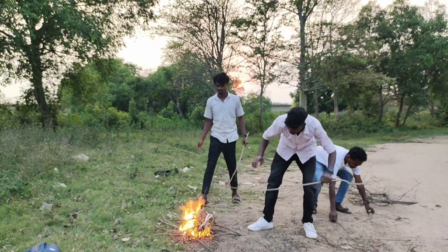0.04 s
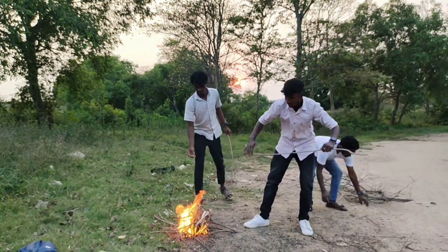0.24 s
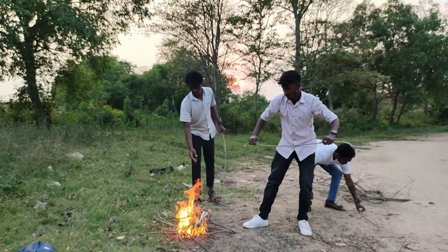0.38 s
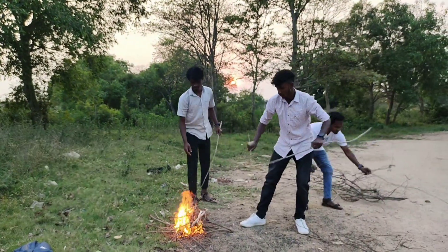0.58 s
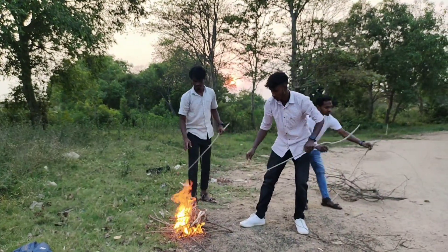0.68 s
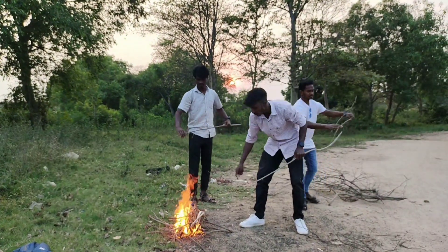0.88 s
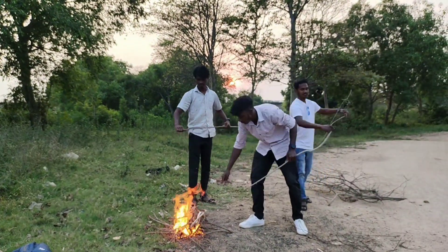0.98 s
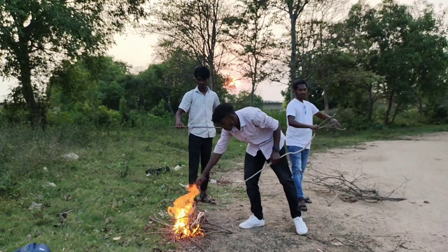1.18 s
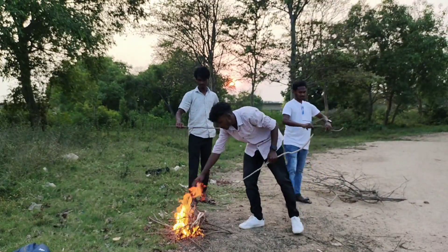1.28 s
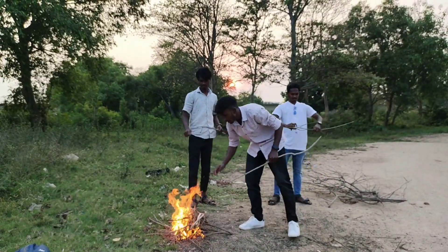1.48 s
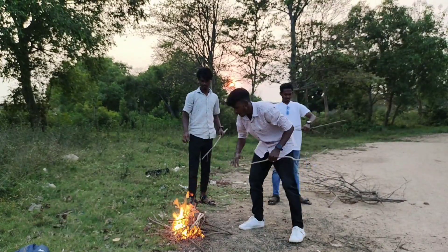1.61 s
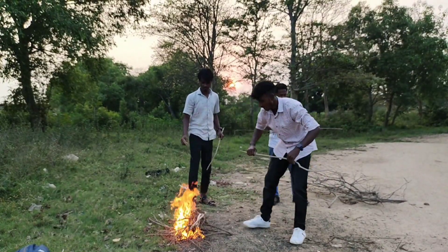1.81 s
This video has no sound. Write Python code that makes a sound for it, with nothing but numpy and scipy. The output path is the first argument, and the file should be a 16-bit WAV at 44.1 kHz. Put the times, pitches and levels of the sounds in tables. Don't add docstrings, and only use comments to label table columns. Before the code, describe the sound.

A small twig fire crackles close by: quick wooden taps and cracks, then one loud sharp pop, then sparse light snaps. Behind it, a steady cicada buzz, chirping birds and a faint distant engine, in stereo outdoors.

```python
import sys
import numpy as np
from scipy import signal
from scipy.fft import rfft, irfft
from scipy.io import wavfile
from scipy.ndimage import uniform_filter1d

SR = 44100
rng = np.random.default_rng(int(sys.argv[2]) if len(sys.argv) > 2 else 0)


def gain_from_db(level_db):
    decades = np.asarray(level_db, float) / 20
    return 10 ** decades


def inscribe(sig):
    pcm = np.round(np.clip(np.atleast_2d(sig).T, -1, 1) * 32767)
    wavfile.write(sys.argv[1], SR, pcm.astype(np.int16))


N = 81585

# freq_hz, density_db (per Hz)
WASH_SPECTRUM = [(30, -22), (60, -14), (110, 1), (300, -7), (600, -18), (2200, -25), (4200, -21),
                 (6500, -33), (15000, -35)]
# freq_hz, coherence (0-1)
WASH_COHERENCE = [(60, 1), (250, 0.78), (640, 0.46), (1500, 0.0087), (15000, 0.078)]
# freq_hz, difference_db
WASH_BALANCE = [(100, 0.82), (1000, 2), (4400, 4.3), (7000, 5)]
# freq_hz, depth_db
WASH_PATCHES = [(100, 1), (500, 3.4), (2000, 3.5)]
# freq_hz, level_db
ENGINE_HUM = [
    (118, -66),
    (173, -63),
]
# start_s, length_s, from_hz, to_hz, level_db
BIRD_NOTES = [(0, 0.0051, 5450, 4720, -45.5), (0.013, 0.026, 5750, 5900, -47),
              (0.118, 0.05, 5560, 5070, -56.5), (0.188, 0.013, 4910, 4920, -51),
              (0.25, 0.029, 5850, 6450, -50.5), (0.319, 0.018, 5800, 5100, -47),
              (0.343, 0.026, 5260, 4550, -52), (0.354, 0.02, 5630, 6100, -51.5),
              (0.392, 0.044, 5500, 5790, -55.5), (0.408, 0.031, 3800, 5520, -53),
              (0.439, 0.022, 5410, 4950, -49.5), (0.486, 0.017, 4650, 3550, -51.5),
              (0.527, 0.024, 5200, 4600, -52.5), (0.633, 0.025, 6220, 5570, -53),
              (0.658, 0.051, 5460, 5000, -51.5), (0.736, 0.027, 5140, 4300, -51.5),
              (0.742, 0.038, 4110, 3470, -53), (0.84, 0.034, 4740, 4650, -51),
              (.588, 0.013, 6140, 5450, -55), (0.589, 0.023, 5100, 4670, -59),
              (0.6, .022, 6000, 6500, -59), (.645, 0.035, 4700, 4480, -60),
              (0.695, 0.02, 4380, 3970, -57.5), (0.774, 0.013, 4620, 4560, -51.5),
              (0.748, 0.032, 5630, 5400, -56.5), (.79, 0.017, 3636, 3960, -54),
              (0.807, 0.013, 4430, 5000, -50.5), (0.825, 0.017, 5270, 5440, -59),
              (0.889, 0.023, 5000, 5200, -56),
              (1.199, .02, 6550, 5870, -50), (1.22, 0.011, 6400, 5640, -74),
                   (1.275, 0.016, 6100, 5800, -54), (1.246, 0.052, 2650, 2470, -65.5),
                   (1.298, 0.045, 4700, 6300, -59), (1.378, 0.021, 5200, 4860, -79),
                   (1.453, 0.013, 3640, 3770, -58), (1.53, 0.012, 5420, 4530, -54.5),
                   (1.553, 0.031, 5150, 4720, -49.5), (1.554, 0.013, 6450, 5880, -54),
                   (1.622, 0.031, 5310, 4580, -49.5), (1.672, 0.034, 5200, 4530, -53),
                   (1.72, 0.03, 5000, 4650, -57.5), (1.758, 0.023, 5230, 4960, -53.5),
                   (1.785, 0.022, 5200, 4540, -50.5), (1.824, 0.01, 4740, 4330, -53)]
# start_s, peak_db
ENGINE_BEATS = [(0.278, -42), (0.305, -40.5), (0.336, -40.5), (0.495, -45.5), (0.53, -42), (0.56, -40.5),
                (0.588, -42.5), (0.66, -50), (0.75, -45.5), (0.776, -40), (0.805, -40.5), (0.841, -40.5),
                (1.002, -42), (1.03, -41), (1.058, -44.5), (1.093, -41), (1.166, -54), (1.25, -43),
                (1.277, -41.5), (1.303, -43.5), (1.34, -44.5), (1.423, -48), (1.499, -42.5), (1.529, -44),
                (1.56, -43), (1.753, -41.5), (1.78, -40.5), (1.815, -41.5)]
# freq_hz, level_db, t60_s
PIPE_MODES = [
    (182, 3, 0.029),
    (289, 3, 0.033),
    (448, -2, 0.036),
]
# start_s, length_s, level_db, centre_hz
GRASS_RUSTLES = [
    (1.014, .042, -50.5, 3500),
    (1.045, .065, -60, 1500),
    (.62, .05, -64, 2000),
    (1.275, .07, -60, 1100),
    (.338, .025, -60, 900),
    (1.427, .025, -61, 900),
    (.928, .02, -60, 1800),
    (1.628, .008, -58, 1200),
]
# start_s, peak_db
WOOD_KNOCKS = [
    (0.0254, -25),
    (0.058, -31.5),
    (0.0877, -31.5),
]
# start_s, body_peak_db, edge_peak_db, ring_t60_s, body_pitch_hz
TWIG_CRACKS = [(0.038, -37, -72, 0.0074, 3450), (0.098, -37, -70, 0.012, 3020),
               (0.0992, -32, -70, 0.043, 3430), (0.1094, -50, -51, 0.0088, 3600),
               (0.3392, -42.5, -50, 0.042, 3620), (0.8017, -38.5, -45.5, 0.0038, 3770),
               (0.8573, -50, -73, 0.016, 3570), (0.9286, -51.5, -55, 0.0096, 2250),
               (1.0123, -47.5, -47, 0.011, 3370), (1.0275, -51, -49, 0.0077, 3370),
               (1.034, -57, -48, 0.0079, 4150), (1.419, -63, -55, .008, 3500),
               (1.4272, -39, -45, 0.0037, 3170), (1.5022, -57.5, -65, 0.0072, 1780),
               (1.5937, -53.5, -46, 0.011, 2240), (1.6297, -55, -64, 0.0031, 1580)]
# freq_hz, density_db (per Hz)
POP_LEFT_COLOUR = [(250, -14), (900, -12), (2200, -3.5), (3600, 10), (6200, -16), (8800, 5), (12000, -3),
                   (15500, 6)]
# freq_hz, density_db (per Hz)
POP_RIGHT_COLOUR = [(300, -23), (1000, -6.5), (2200, -3.5), (3300, 2.5), (6200, -7), (8800, -1), (12000, 5),
                    (15500, -15)]
# freq_hz, factor
POP_DECAY = [(400, 1.3), (3300, 1), (8000, .8), (14000, .7)]
# freq_hz, width_hz, level_db
TWIG_MODES = [(1335, 140, -3.5), (2220, 90, 1.5), (3400, 39, -30), (3930, 24, -3), (4270, 35, -1.5),
              (5000, 32, -21), (7040, 35, -2.5), (7970, 160, 11.5), (8060, 21, -12), (8840, 140, -4),
              (10310, 16, -29), (11020, 19, -8), (10900, 68, -13), (12700, 28, -14)]

WASH_DB = -55.5
CICADA_HZ, CICADA_WIDTH_HZ, CICADA_DB, CICADA_LEFT_DB = 8184, 1640, -52.5, -13
CLICKS_PER_S, CLICK_JITTER, CHORUS_DB = 240, 0.021, 8
THROBS_PER_S, THROB_DB, THROB_START_TURNS = 16.2, 1.2, 0.94
DRUM_SWEEP_HZ, DRUM_WIDTH_HZ, DRUM_DB = 220, 330, -1
BIRD_RIGHT_DB, BIRD_WOBBLE, BIRD_RASP_DB = -7, 0.019, 3.2
TREE_ECHO_DB, TREE_ECHO_T60_S = -4, 0.11
FLOCK_COUNT, FLOCK_LOW_HZ, FLOCK_HIGH_HZ, FLOCK_DB = 130, 3600, 5900, -64
BEAT_RISE_S, BEAT_LAG_S, BEAT_DB = 0.0023, 0.0018, -1
SNAPS_PER_S, SNAP_AIR_DB = 3500, -9
KNOCK_HZ, KNOCK_T60_S, KNOCK_PUSH_S = 272, 0.023, 0.00039
KNOCK_PUSH_DB, KNOCK_RIGHT_DB = 1.5, -18
BODY_HZ, BODY_WIDTH_HZ = 3500, 2300
EDGE_HZ, EDGE_WIDTH_HZ, EDGE_UP_DB = 12500, 5000, 4
RING_DB, CRACK_PAN_DB, SPLIT_SHARE = -7, 6, 0.35
TICKS_PER_S, TICKS_DB, TICKS_SPREAD_DB = 25, -64, 3
POP_S, POP_DB, POP_T60_S, POP_SNAP_DB = 0.2332, -16.5, 0.031, 2
POP_BOUNCE_S, POP_BOUNCE_DB = 0.00093, -4
POP_TAIL_DB, POP_TAIL_TILT_DB, POP_TAIL_T60_S = -27, -5, 0.39
THUD_HZ, THUD_DB = 425, -12
TWIG_MODES_DB, POP_LEFT_LAG_S = -14.5 + 7.5, 0.00031
HISS_LEAD_S, HISS_DB = 0.0052, -30 + 10
LOW_CUT_HZ, TOP_HZ = 75, 15400


def evened(x):
    return x / np.sqrt(np.mean(x ** 2) + 1e-20)


def peaked(x):
    return x / abs(x).max()


def read(points, hz):
    f, value = np.transpose(points)
    return np.interp(np.log(hz + 1), np.log(f + 1), value)


def add(mix, start_s, sound):
    part = mix[..., max(round(start_s * SR), 0):][..., :sound.shape[-1]]
    part += sound[..., :part.shape[-1]]


def resonate(x, hz, width):
    turn = np.exp(2j * np.pi * np.cumsum(hz * np.ones(x.shape[-1])) / SR)
    r = np.exp(-np.pi * width / SR)
    return 2 * (turn * signal.lfilter([1 - r], [1, -r], x / turn)).real


def wash():
    frames, hz = N // 256 + 5, np.fft.rfftfreq(1024, 1 / SR)
    a, b, c, d, patches = rng.standard_normal((frames, 513, 5)).T
    patches = uniform_filter1d(patches, size=20, axis=0)
    patches = evened(uniform_filter1d(patches, size=8, axis=1))
    same = np.clip(read(WASH_COHERENCE, hz), -1, 1)[:, None]
    pan = read(WASH_BALANCE, hz)[:, None] / 2
    left = a + 1j * b
    right = same * left + np.sqrt(1 - same ** 2) * (c + 1j * d)
    z = np.array([left * gain_from_db(pan), right * gain_from_db(-pan)])
    z *= gain_from_db(read(WASH_SPECTRUM, hz)[:, None] + read(WASH_PATCHES, hz)[:, None] * patches)
    return gain_from_db(WASH_DB) * evened(signal.istft(z, nperseg=1024, noverlap=768)[1][:, :N])


def hum():
    return sum(gain_from_db(db) * evened(resonate(rng.standard_normal(N), hz, 14.4)) for hz, db in ENGINE_HUM)


def cicada():
    t = np.arange(N) / SR
    jitter = evened(uniform_filter1d(rng.standard_normal(N), size=400))
    turns = np.cumsum(CLICKS_PER_S * (1 + CLICK_JITTER * jitter)) / SR
    clicks = np.diff(np.floor(turns), prepend=0) * gain_from_db(3 * rng.standard_normal(N))
    drive = evened(clicks) + gain_from_db(CHORUS_DB) * rng.standard_normal((2, N))
    swing = np.sin(2 * np.pi * (THROBS_PER_S * t + THROB_START_TURNS))
    note = CICADA_HZ + 60 + DRUM_SWEEP_HZ * swing
    drum = resonate(resonate(drive, note, DRUM_WIDTH_HZ), note, 2 * DRUM_WIDTH_HZ)
    blur = resonate(resonate(drive, CICADA_HZ, CICADA_WIDTH_HZ), CICADA_HZ, 1570)
    song = evened(evened(blur) + gain_from_db(DRUM_DB) * evened(drum))
    return song * gain_from_db(THROB_DB * swing) * gain_from_db([[CICADA_DB + CICADA_LEFT_DB], [CICADA_DB]])


def birds():
    dry = np.zeros(N)
    wobble = evened(uniform_filter1d(rng.standard_normal(N), size=90))
    a, b, c, d, e = rng.random((FLOCK_COUNT, 5)).T
    pitch = FLOCK_LOW_HZ + (FLOCK_HIGH_HZ - FLOCK_LOW_HZ) * c
    glide_to = pitch * (0.92 + 0.1577 * d)
    flock = zip(a * N / SR, 0.0053 + 0.0186 * b, pitch, glide_to, FLOCK_DB + 8 * (e - 0.5))
    for s, length, from_hz, to_hz, db in [*BIRD_NOTES, *flock]:
        u = np.arange(0, length, 1 / SR) / length
        place = int(s * SR / 2)
        hz = (from_hz + (to_hz - from_hz) * u) * (1 + BIRD_WOBBLE * wobble[place:][:len(u)])
        rasp_db = BIRD_RASP_DB * wobble[-place - 4000:][:len(u)]
        swell = np.sin(np.pi * u) ** 0.27
        add(dry, s, gain_from_db(db - 1.5 + rasp_db) * swell * np.sin(2 * np.pi * np.cumsum(hz) / SR))
    t = np.arange(SR // 2) / SR
    trees = rng.standard_normal((2, len(t))) * gain_from_db(-60 * t / TREE_ECHO_T60_S) * (t > 0.004)
    wet = signal.fftconvolve(dry[None], trees / np.linalg.norm(trees[0]), axes=1)[:, :N]
    return (dry + gain_from_db(TREE_ECHO_DB) * wet) * gain_from_db([[0], [BIRD_RIGHT_DB]])


def engine():
    out, t = np.zeros(N), np.arange(4000) / SR
    for s, db in ENGINE_BEATS:
        bend = rng.uniform(0.907, 1.02, len(PIPE_MODES))
        thump = sum(gain_from_db(d - 60 * t / t60) * np.sin(2 * np.pi * hz * k * t)
                    for (hz, d, t60), k in zip(PIPE_MODES, bend))
        add(out, s + BEAT_LAG_S, -gain_from_db(db + BEAT_DB) * thump * np.minimum(t / BEAT_RISE_S, 1))
    return out * gain_from_db([[0.7], [-0.7]])


def rustles():
    out = np.zeros((2, N))
    for s, length, db, hz in GRASS_RUSTLES:
        snaps = rng.standard_normal((2, 8000)) * (rng.random(8000) < SNAPS_PER_S / SR)
        airy = evened(np.diff(snaps, prepend=0))
        sound = evened(resonate(snaps, hz, hz * 0.6)) + gain_from_db(SNAP_AIR_DB) * airy
        u = np.arange(8000) / SR / length
        add(out, s, gain_from_db(db) * sound * np.sin(np.pi * np.minimum(u, 1) ** 0.69))
    return out


def knocks():
    out, t = np.zeros(N), np.arange(2000) / SR
    u = t / KNOCK_PUSH_S
    push = u * (2 - u) * np.exp(1 - u)
    ring = np.sin(2 * np.pi * KNOCK_HZ * t + 3.25) * gain_from_db(-60 * t / KNOCK_T60_S) * np.minimum(u / 2, 1)
    tap = ring + gain_from_db(KNOCK_PUSH_DB) * push
    for s, db in WOOD_KNOCKS:
        add(out, s, gain_from_db(db - 2.0) * tap)
    return out * gain_from_db([[0], [KNOCK_RIGHT_DB]])


def crack(body_db, edge_db, t60, hz):
    t, t60 = np.arange(1500) / SR, max(t60, 0.003)
    noise = rng.standard_normal(1500) + 0.4 * rng.standard_normal((2, 1500))
    noise = noise * np.minimum(t / 0.0001, 1)
    split = noise * gain_from_db(-60 * t / (SPLIT_SHARE * t60 + 0.002))
    width = BODY_WIDTH_HZ * hz / BODY_HZ
    wood = resonate(resonate(split, hz, width), hz, width)
    body = peaked(wood) + gain_from_db(RING_DB) * peaked(resonate(wood, 1.065 * hz, 2.2 / t60))
    edge = resonate(noise * gain_from_db(-60 * t / t60), EDGE_HZ, EDGE_WIDTH_HZ)
    edge = peaked(resonate(edge, EDGE_HZ, EDGE_WIDTH_HZ))
    pan = gain_from_db([[CRACK_PAN_DB / 2], [-CRACK_PAN_DB / 2]])
    return gain_from_db(body_db) * body * pan + gain_from_db(edge_db + EDGE_UP_DB) * edge


def pop():
    t, hz = np.arange(8192) / SR, np.fft.rfftfreq(8192, 1 / SR)
    colour_db = [read(POP_LEFT_COLOUR, hz), read(POP_RIGHT_COLOUR, hz)]
    z = rfft(rng.standard_normal((2, 8192))) * gain_from_db(colour_db)
    z = z / np.std(irfft(z))
    late, burst = t - POP_BOUNCE_S, 0
    octave = np.clip(np.log2((hz + 1) / 400), 0, 5)
    for k in range(6):
        t60 = POP_T60_S * read(POP_DECAY, 400 * 2 ** k)
        shape = gain_from_db(-60 * t / t60)
        shape += (late > 0) * gain_from_db(POP_BOUNCE_DB - 60 * abs(late) / t60)
        shape += gain_from_db(POP_SNAP_DB - 60 * t / 0.004)
        shape += gain_from_db(POP_TAIL_DB + POP_TAIL_TILT_DB * abs(k - 3) - 60 * t / POP_TAIL_T60_S)
        burst = burst + irfft(z * np.maximum(1 - abs(octave - k), 0)) * shape
    thud = np.sin(2 * np.pi * THUD_HZ * t) * gain_from_db(THUD_DB - 60 * t / POP_T60_S) * gain_from_db([[0], [-8]])
    heard = np.maximum(t - np.array([[POP_LEFT_LAG_S], [0]]), 0)
    rings = 0
    for k, (f, width, db) in enumerate(TWIG_MODES):
        decay = np.exp(-np.pi * max(width, 65) * heard)
        rings = rings + (-1) ** k * gain_from_db(db) * decay * np.sin(2 * np.pi * f * heard)
    return gain_from_db(POP_DB) * (burst + thud + gain_from_db(TWIG_MODES_DB) * rings)


def fire():
    out = np.zeros((2, N))
    for s, *settings in TWIG_CRACKS:
        add(out, s, crack(*settings))
    ticks = gain_from_db(TICKS_DB + TICKS_SPREAD_DB * np.minimum(rng.exponential(1, N), 3))
    ticks = ticks * (rng.random(N) < TICKS_PER_S / SR)
    out += signal.oaconvolve(ticks[None], crack(0, -6, 0.006, BODY_HZ), axes=1)[:, :N]
    add(out, POP_S, pop())
    lead = np.linspace(0.5, 1, round(HISS_LEAD_S * SR))
    hiss = lead * rng.standard_normal((2, len(lead)))
    add(out, POP_S - HISS_LEAD_S, gain_from_db(POP_DB + HISS_DB) * hiss)
    return out


def scene():
    return wash() + hum() + cicada() + birds() + engine() + rustles() + knocks() + fire()


def top_cut(x):
    return signal.sosfilt(signal.butter(12, 16470, fs=SR, output="sos"), x)


def record(dry):
    cut = signal.sosfilt(signal.butter(2, LOW_CUT_HZ, "high", fs=SR, output="sos"), dry)
    cut = signal.sosfiltfilt(signal.butter(10, TOP_HZ, fs=SR, output="sos"), cut)
    return top_cut(cut)


dry = scene()
out = record(dry)
inscribe(out)
```